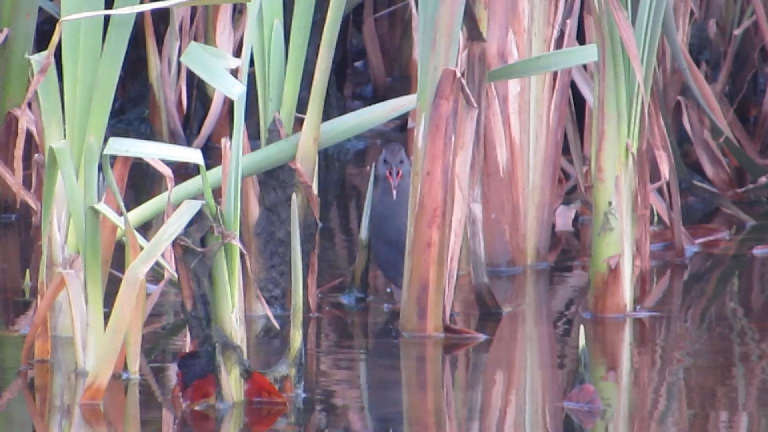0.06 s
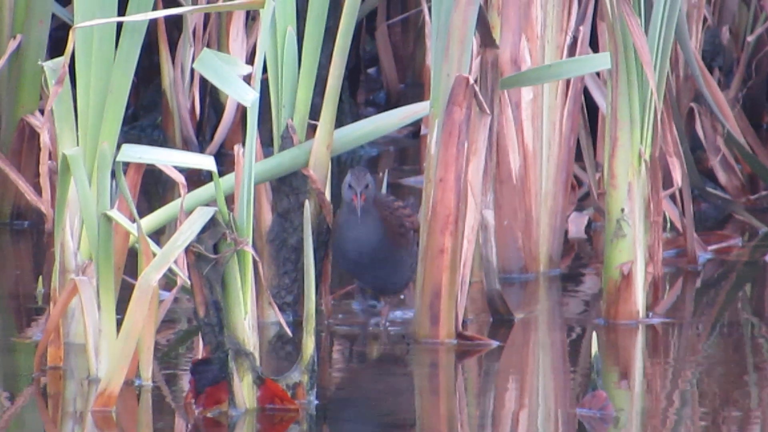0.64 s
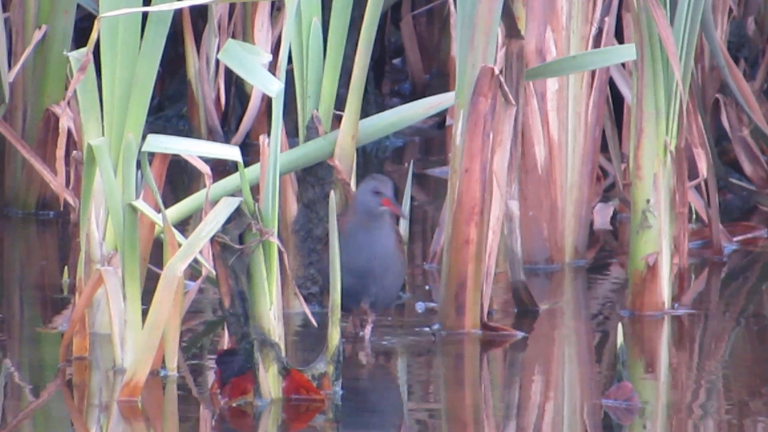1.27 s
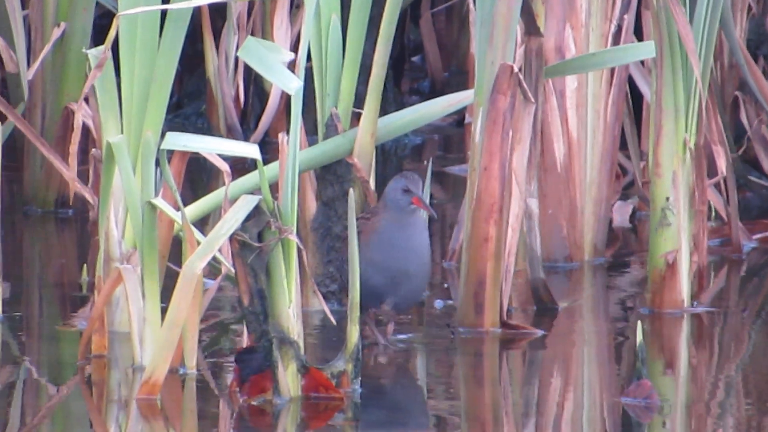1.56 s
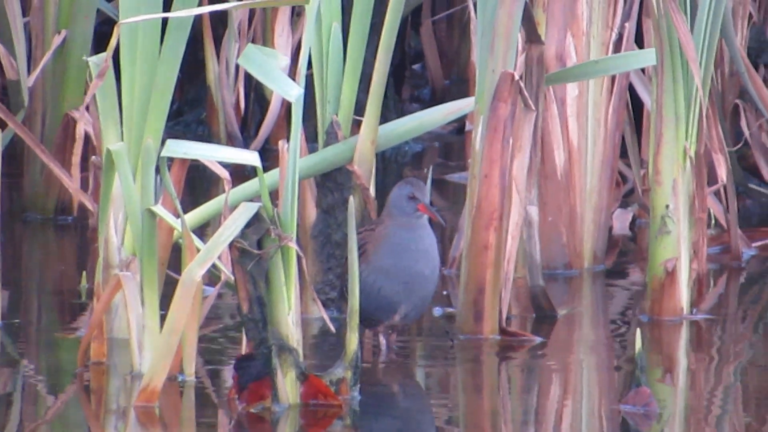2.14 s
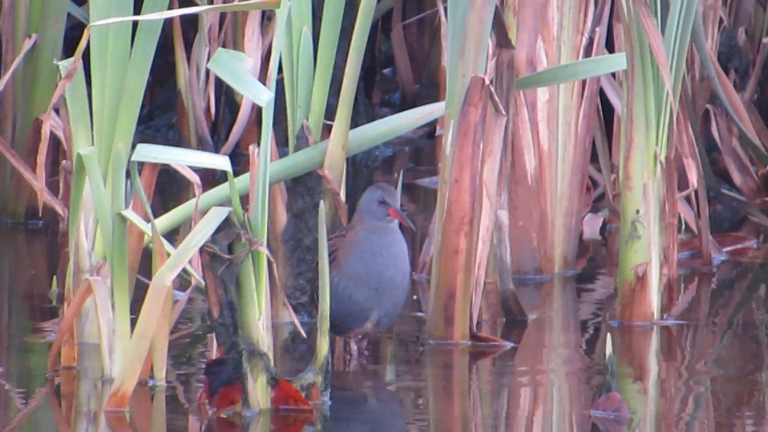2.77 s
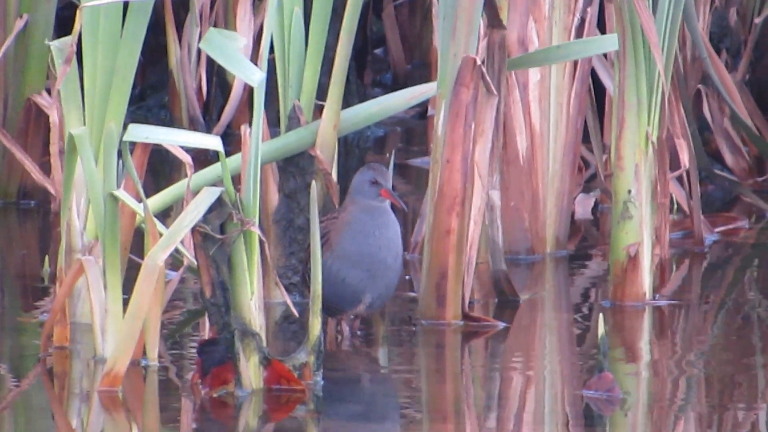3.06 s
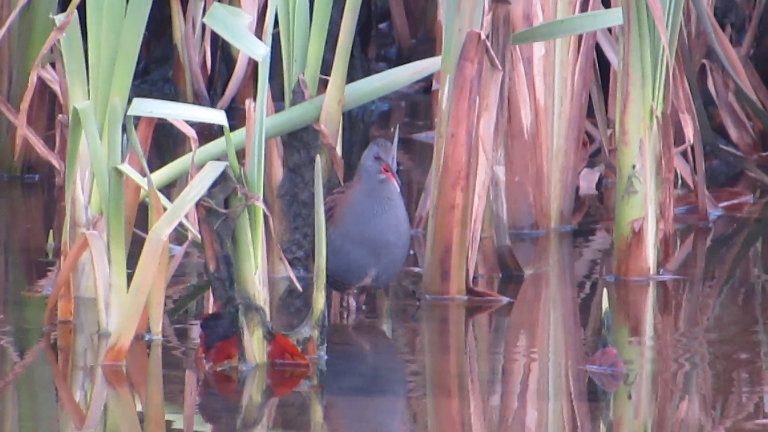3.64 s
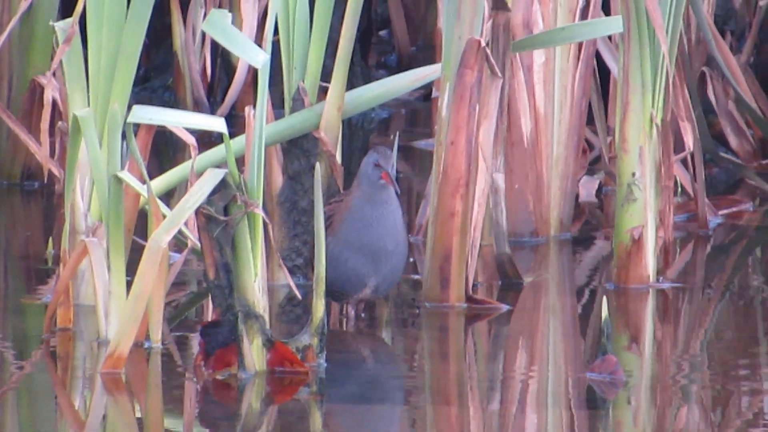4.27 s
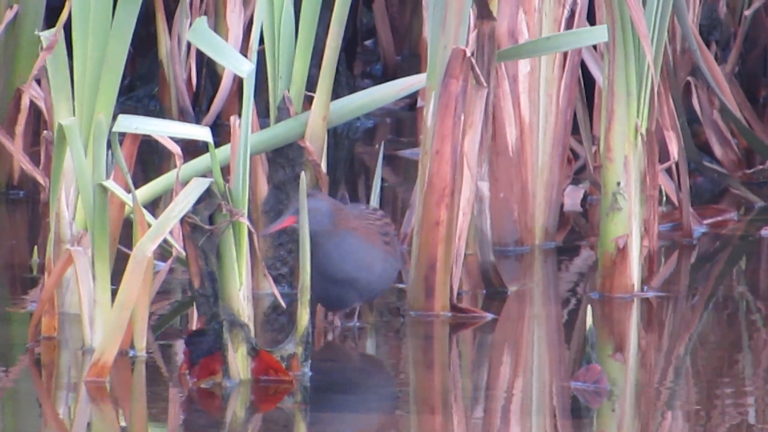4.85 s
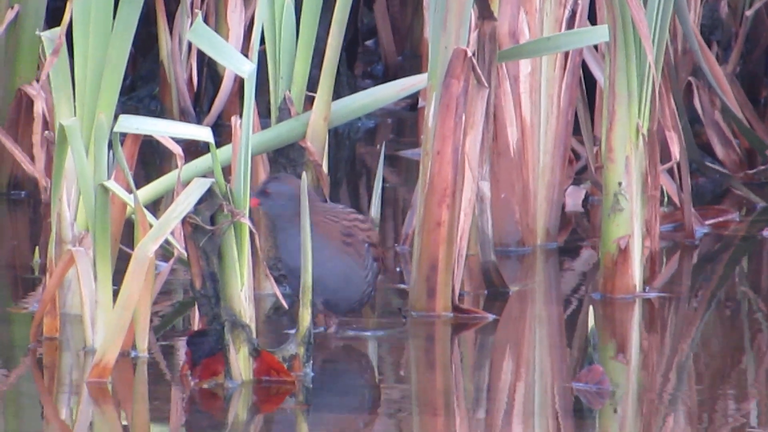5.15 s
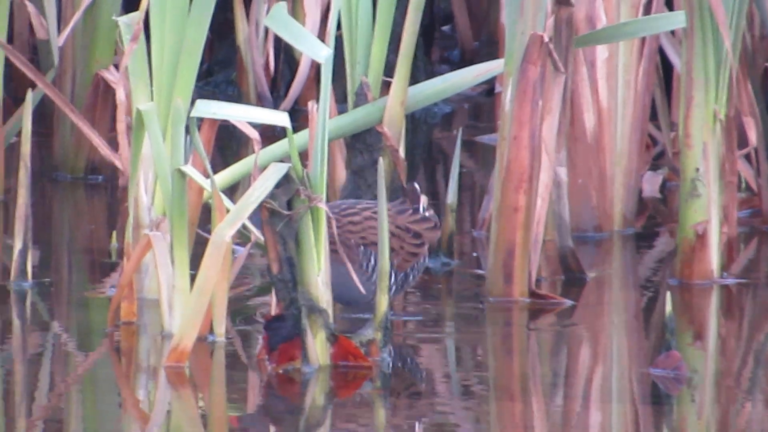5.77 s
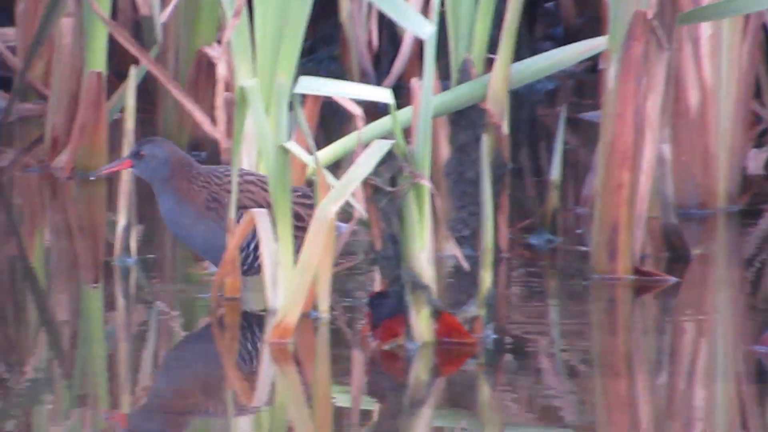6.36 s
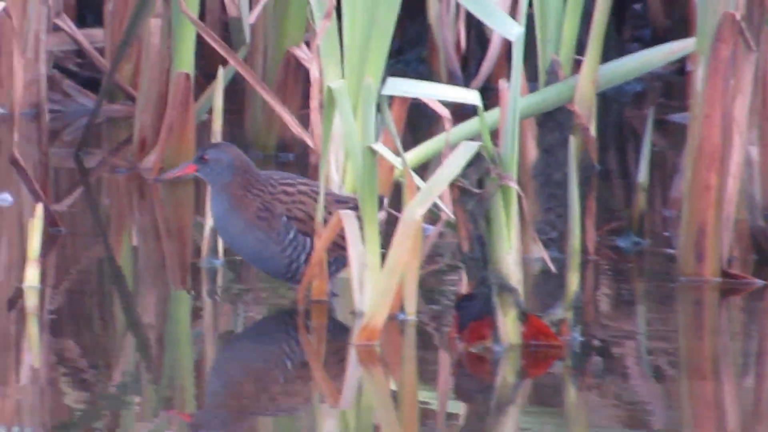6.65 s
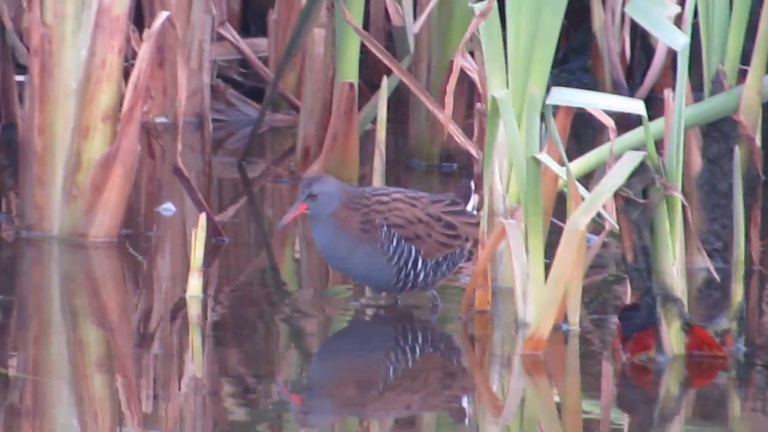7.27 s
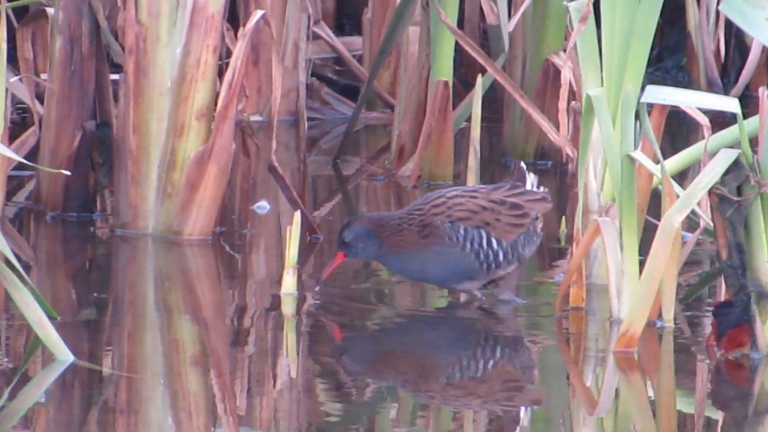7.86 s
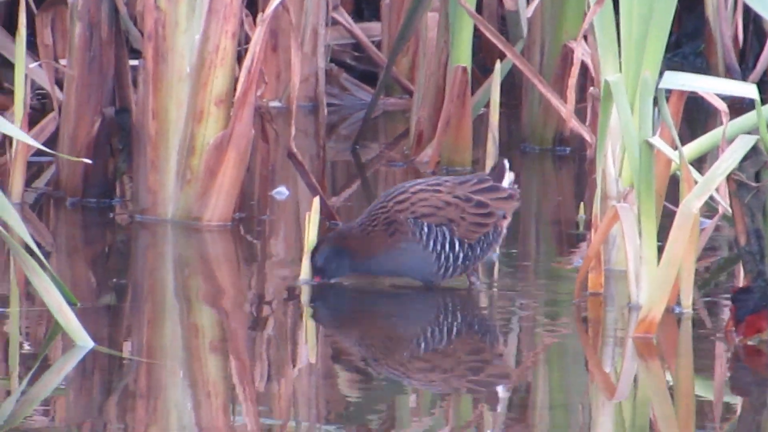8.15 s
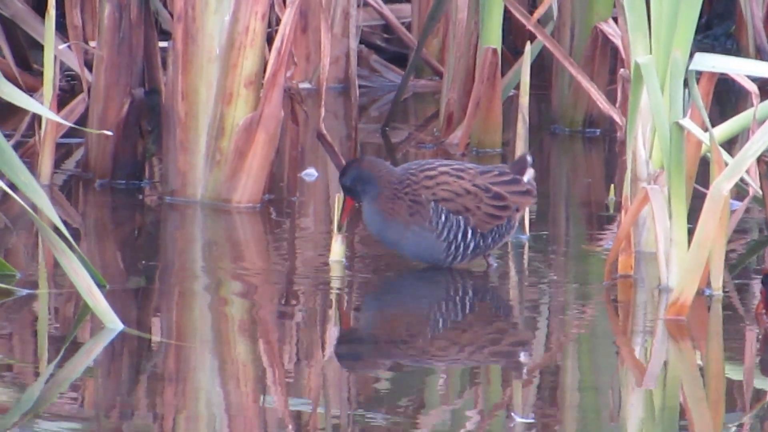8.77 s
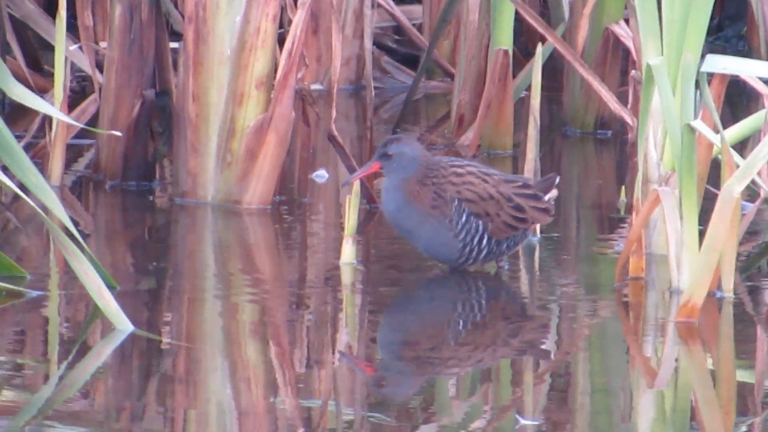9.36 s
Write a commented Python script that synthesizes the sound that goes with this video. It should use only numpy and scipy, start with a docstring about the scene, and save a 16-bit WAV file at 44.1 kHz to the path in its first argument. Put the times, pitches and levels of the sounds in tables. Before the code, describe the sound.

Wind buffets the microphone in uneven thumps over a marsh bird's brief rasping squeals and faint distant chirps.

```python
"""A shallow pool among reeds. A water rail wades and squeals four times: rasp, rising whistle, falling
screech. Other birds call faintly far off, over a soft outdoor murmur and one rustle of the reeds.
Gusts buffet the microphone ports of a hand-held camera, pushing the two channels in opposite directions;
the hardest buffets make its limiter duck the whole scene, which then creeps back.
The camera clicks under the fingers, and its electronics whine thinly."""
import sys
import numpy as np
from scipy import signal
from scipy.io import wavfile
from scipy.ndimage import uniform_filter1d

SR = 44100
rng = np.random.default_rng(int(sys.argv[2]) if len(sys.argv) > 2 else 0)


def waveform_to_disk(signal):
    """Save audio, clipped to [-1, 1], as 16-bit WAV at the path in sys.argv[1]."""
    frames = np.transpose(np.atleast_2d(signal))
    scaled = np.clip(frames, -1, 1) * 32767
    samples = np.round(scaled).astype(np.int16)
    wavfile.write(sys.argv[1], SR, samples)


N = 419391
TIME = np.arange(N) / SR
CUTOFF_HZ = 15800


# throat and bill response: f/Hz, gain/dB
THROAT = [(1100, 0), (1600, -2), (2300, 8.5), (3000, 8), (3700, 7), (4600, -3.5), (5700, -9), (7000, -19),
          (8300, -28), (11000, -27.5), (14000, -48)]
# t/s (start, whistle, break, end), f/Hz (opening, whistle start, whistle end, break, end),
# rise bend (<1 early, >1 late), level/dB (opening, whistle, fall), rasp/0-1 (opening, whistle),
# treble tilt/dB per harmonic
SQUEALS = [(-0.01, 0.123, 0.27, 0.34, 2963, 2450, 2844, 3330, 2050, 1.16, -43.5, -39, -41.5, .82, 0.18, 7),
           (0.901, 1.047, 1.234, 1.31, 2425, 2287, 2833, 3050, 2465, 1.23, -59, -34, -34.5, .84, 0.06, 5.5),
           (3.292, 3.451, 3.68, 3.787, 2760, 2354, 3140, 3140, 2240, .45, -47.5, -35.5, -35, 0.87, 0.7, -5),
           (6.078, 6.175, 6.269, 6.385, 2920, 2520, 2900, 3310, 2420, 1.1, -44, -33, -35, 0.69, 0.08, 1)]


def squeal(row, subharmonic_db=-3, jitter=0.0704, waver=0.0041, flutter_db=2, creak_hz=480):
    """The rail's syrinx whistles, doubles its period as rasp grows, then breaks into a harsh screech."""
    start, _, _, end, *_, treble_db = row
    span = (TIME >= start) & (TIME <= end)
    t, out = TIME[span], np.zeros(N)
    hz, level_db, rasp = squeal_gesture(t, row)
    doubled, chaos = np.clip(2 * rasp, 0, 1), np.clip(2 * rasp - 1, 0, 1)
    unsteady = 1 + waver * drift(73, len(t)) + jitter * chaos ** 2 * drift(390, len(t))
    phase = 2 * np.pi * np.cumsum(hz * unsteady) / SR
    voice = 0
    for k in range(1, 11):
        multiple = k / 2
        throat_db = at_hz(THROAT, multiple * hz) - at_hz(THROAT, hz)
        # top partials fade when the bill points away or the voice is rough
        tilt_db = max(multiple - 2, 0) * (treble_db - 5 * doubled) - 3 * doubled * (multiple >= 2)
        share = from_db(subharmonic_db) * doubled if k % 2 else 1
        gain = share * from_db(throat_db + tilt_db + flutter_db * drift(57, len(t)))
        voice += gain * np.sin(multiple * phase) * (multiple * hz < CUTOFF_HZ)
    # irregular membrane motion fills the throat resonance with noise, in uneven pulses
    scratch = band_pass(rng.standard_normal(len(t)), hz=(2050, 3700))
    creak = np.cos(2 * np.pi * np.cumsum(creak_hz * (1 + 0.151 * drift(78.4, len(t)))) / SR)
    scratch = rms_one(scratch * from_db(7 * creak))
    voice *= 1 + 0.55 * rasp * creak
    hoarse = 0.75 * rasp ** 2
    out[span] = from_db(level_db) * (np.sqrt(2 * (1 - hoarse)) * voice + hoarse * scratch)
    return out


def squeal_gesture(t, row, attack_s=0.0081, flip_s=0.0031, release_s=0.012, swell_db=6, fade_db=4.5):
    """Pitch, level and rasp (0 pure, 0.5 period doubled, 1 harsh) through opening, whistle and fall."""
    start, clear, split, end, opening_hz, first_hz, last_hz, break_hz, end_hz, bend = row[:10]
    opening_db, whistle_db, fall_db, opening_rasp, whistle_rasp = row[10:15]
    silent_db, break_rasp, end_rasp = -57, 0.41, 0.68
    arch = 1 - 0.14 * (progress(t, start, clear) / 0.62 - 1) ** 2
    opening = opening_hz * (arch + 0.04 * drift(24.7, len(t)))
    rise = np.sin(np.pi / 2 * progress(t, clear, split) ** bend) ** 2
    whistle = first_hz + (last_hz - first_hz) * rise
    fall = break_hz + (end_hz - break_hz) * progress(t, split, end) ** 2.2
    hz = np.select([t < clear, t < split], [opening, whistle], fall)
    level_db, rasp = in_time([
        (start, silent_db, opening_rasp),
        (start + attack_s, opening_db, opening_rasp),
        (clear - flip_s, whistle_db - swell_db, opening_rasp),
        (clear, whistle_db - swell_db, whistle_rasp),
        (clear + 0.73 * (split - clear), whistle_db, whistle_rasp),
        (split, whistle_db, whistle_rasp),
        (split + flip_s, fall_db, break_rasp),
        (end - release_s, fall_db - fade_db, end_rasp),
        (end, silent_db, end_rasp)], t)
    return hz, level_db, rasp


# t/s, length/s, f/Hz (start, middle, end), level/dB, octave overtone/dB
SECOND_VOICE = [(3.53, 0.11, 2500, 2550, 2640, -44.5, -28), (6.035, .03, 2050, 2680, 2250, -47, -20),
                (6.103, 0.0566, 3690, 3660, 3380, -44, -28), (6.272, 0.056, 2790, 2770, 2720, -45, -28)]


def water_rail():
    """Squeals among the reeds; the other side of the syrinx joins in with brief whistles."""
    return reed_echo(sum(squeal(row) for row in SQUEALS) + whistles(SECOND_VOICE), wet_db=-13)


def whistles(rows, waver=0.0058, flutter_db=2.5):
    """Thin bird notes on parabolic pitch curves, each with an octave overtone."""
    out = np.zeros(N)
    for s, length, first_hz, middle_hz, last_hz, level_db, octave_db in rows:
        span = (TIME > s) & (TIME < s + length)
        u = (TIME[span] - s) / length
        hz = np.polyval(np.polyfit([0, 0.5, 1], [first_hz, middle_hz, last_hz], 2), u)
        phase = 2 * np.pi * np.cumsum(hz * (1 + waver * drift(110, len(u)))) / SR
        swell = np.sqrt(2 * np.abs(np.sin(np.pi * u)))
        gain = from_db(level_db + flutter_db * drift(30, len(u)))
        out[span] += swell * gain * (np.sin(phase) + from_db(octave_db) * np.sin(2 * phase))
    return out


def reed_echo(x, wet_db, t60_s=0.2):
    """Stems and water scatter a short diffuse tail, different on each side."""
    t = TIME[:SR // 2]
    tail = rng.standard_normal((2, len(t))) * from_db(-60 * t / t60_s) * (t > 0.003)
    tail /= np.sqrt(np.sum(tail ** 2) / 2)
    return x + from_db(wet_db) * signal.fftconvolve(x[None], tail, axes=1)[:, :N]


# sustained wind on the ports: t/s, length/s, relative level/dB
GUSTS = [(0.0, 0.051, -19), (0.236, 0.24, -30), (1.894, 0.047, -14), (2.675, 0.11, -13.5),
         (2.862, 0.39, -1.5), (3.572, .25, -6.5), (4.144, 0.12, -5.5), (4.212, 0.16, 3.5),
         (4.416, 0.047, -5), (4.808, 0.59, -11.5), (5.361, .15, -2.5), (5.533, 0.095, 1.5),
         (5.658, 0.28, -8), (6.52, 0.28, -14.5), (6.905, 0.43, -13), (7.908, 0.38, -11), (8.124, 0.4, -9)]
# brief wind on the ports: t/s, relative level/dB
PUFFS = [(1.002, -15.5), (1.229, -15), (1.57, -28), (2.4, -18.5), (2.721, -8), (3.41, -17), (3.92, -9.5),
         (4.001, -9), (4.601, -9.5), (5.0, -5), (5.801, -2), (6.05, -14), (6.161, -13), (6.7, -7.5),
         (6.93, -8.5), (7.03, -3), (7.12, -8), (7.21, -8), (7.298, -6), (7.902, -7.5), (8.36, -5),
         (8.86, -17), (8.98, -19.5), (9.08, -22), (9.48, -27.5)]


def wind_strength(rise_s=0.025, fall_s=0.04, puff_s=0.02, breeze_db=-29):
    """Gusts, puffs and a light breeze add in power."""
    power = from_db(breeze_db) ** 2
    for s, length, level_db in GUSTS:
        outside = np.maximum(s - TIME, 0) / rise_s + np.maximum(TIME - s - length, 0) / fall_s
        power += (from_db(level_db) * np.exp(-np.minimum(outside, 20))) ** 2
    for s, level_db in PUFFS:
        power += from_db(level_db) ** 2 * bump(s, puff_s)
    return np.sqrt(power)


def wind(lump_db=4, eddy_hz=186.3, steepness=4.86, bass_hz=78, top_hz=1250, common_db=-14, gain_db=-1.3):
    """Eddies roll over the ports in lumps of rumble; a stronger lump is also brighter."""
    lumps = rms_one(from_db(lump_db * np.clip(drift(40), -2, 2)))
    strength = wind_strength() * from_db(gain_db) * lumps
    corner_hz = eddy_hz * (10 * strength) ** 0.41
    rumble, power = 0, 0
    for hz, pair in noise_bands(16, count=14):
        slope = hz ** -0.43 / (1 + (bass_hz / hz) ** 2) ** 0.37
        gain = slope / np.sqrt(1 + (hz / corner_hz) ** (2 * steepness))
        rumble += gain * pair
        power += gain ** 2 * hz
    common, opposed = low_pass(rms_one(rumble / np.sqrt(power)) * strength, top_hz, order=4)
    return stereo(from_db(common_db) * common, opposed)


# hard hits of wind: t/s, level/dB, swing f/Hz, tick share/0-1
BUFFETS = [(1.951, 0, 164, 0.1), (1.977, 11.5, 170, 0.21), (2.718, 2, 150, .15), (2.85, -1, 525, 0.15),
           (2.856, 8.5, 214, 0.07), (2.89, 2, 143, 0.18), (2.909, 9, 195, 0.13), (2.984, 5, 467, 0),
           (3.081, 11, 407, 0.22), (3.156, 10, 390, 0.02), (3.81, 9, 195, .07), (4.203, 16, 460, 0.1),
           (4.209, 10, 332, 0.26), (4.22, 15, 203, 0.24), (5.009, 6, 158, 0.04), (5.385, 8.5, 215, 0.14),
           (5.517, 13, 242, 0.08), (6.953, 7.5, 174, 0.06), (7.02, 0.5, 327, 0.05), (7.114, 3.5, 150, 0.05),
           (7.255, 10, 530, 0.23), (7.905, 4, 302, 0.02), (8.112, 9, 194, 0.11), (8.227, 1, 483, 0.05)]


def buffets(width_cycles=0.43, common_db=-13, tick_s=0.00048):
    """One big thump of wind each, with a sharp tick standing for the limiter's sudden gain step."""
    out = np.zeros(N)
    for s, level_db, hz, tick_share in BUFFETS:
        near = np.abs(TIME - s) < 0.03
        t = TIME[near] - s
        swing = np.exp(-(t * hz / width_cycles) ** 2) * np.cos(2 * np.pi * hz * t)
        tick = tick_share * (t > 0) * np.exp(-np.abs(t) / tick_s)
        out[near] += from_db(level_db) * (swing - tick)
    return stereo(-from_db(common_db) * out, out)


# fingers on the camera: t/s, relative level/dB
CLICKS = [(3.698, -10), (3.704, -13), (4.066, -9), (4.0733, -23.5), (9.344, -43.5)]
# camera shell resonances: f/Hz, width/Hz, relative level/dB
SHELL_MODES = [(750, 1030, -4.5), (1830, 290, 3.5), (2290, 110, 1), (2910, 280, -4), (4850, 690, -4.5),
               (9560, 270, -8), (11300, 390, -5.5)]


def finger_clicks(rise_s=0.0021, fall_s=0.0031, rattle_db=-28, rattle_s=0.016, gain_db=9):
    """Bursts of tiny slips ring the shell and reach the two ports differently."""
    force = np.zeros(N)
    for s, level_db in CLICKS:
        t = np.abs(TIME - s)
        before = np.exp(-t / rise_s) * (t < 0.003)
        after = np.exp(-t / fall_s) + from_db(rattle_db) * np.exp(-t / rattle_s)
        force += from_db(level_db) * np.where(TIME < s, before, after)
    slips = force * rng.standard_normal((2, N)) + 1e-18
    out = 0
    for k, (hz, width_hz, level_db) in enumerate(SHELL_MODES):
        r = np.exp(-np.pi * width_hz / SR)
        mode = signal.lfilter([1, 0, -1], [1, -2 * r * np.cos(2 * np.pi * hz / SR), r * r], slips)
        out += (-1) ** k * from_db(level_db + gain_db) * (1 - r * r) / 2 * mode
    return out * pan(db=-6.5)


# wading steps: t/s, level/dB
SLOSHES = [(0.45, -40.5), (0.73, -41.5)]


def sloshes(half_width_s=0.042, band_hz=(520, 1150)):
    """Water pushed aside by the rail's steps: short, dull swells of noise."""
    swell = sum(from_db(level_db) * bump(s, half_width_s) for s, level_db in SLOSHES)
    return swell * rms_one(band_pass(rng.standard_normal((2, N)), band_hz))


# t/s, length/s, f/Hz (start, middle, end), level/dB, octave overtone/dB
FAR_CALLS = [(0.768, 0.097, 2880, 2720, 2650, -55, -30), (1.717, 0.065, 2550, 2610, 2380, -54.5, -30),
             (4.649, 0.1, 2850, 2830, 2740, -56, -30), (5.435, .08, 7600, 7150, 6700, -56, -51),
             (7.569, 0.025, 1170, 1176, 1150, -43.5, -13), (7.595, 0.175, 1448, 1413, 1190, -49.5, -11.5),
             (9.19, 0.03, 2130, 2050, 2150, -57, -23), (9.44, 0.058, 1064, 1132, 1240, -52.5, -5)]


def far_birds():
    """Faint whistles, scattered by the reeds."""
    return reed_echo(whistles(FAR_CALLS), wet_db=-10.5)


# rustle envelope: t/s, level/dB
REED_LEVEL = [(2.3, -69), (2.48, -42), (2.55, -35), (2.72, -41.5), (3.1, -69)]
# rustle spectrum: f/Hz, relative density/dB
REED_SPECTRUM = [(400, -3), (900, 11), (3000, -9), (5000, -31), (12000, -33)]


def reeds():
    """One breath of wind rustles the reeds."""
    level_db, = in_time(REED_LEVEL, TIME)
    return from_db(level_db) * diffuse_noise(REED_SPECTRUM)


# whine pitch: t/s, f/Hz
WHINE_PITCH = [(0, 8980), (1.85, 9090), (4.1, 9200), (9.5, 9580)]


def whine(lower_db=-28, upper_hz=13287, upper_db=-37, wander_hz=8):
    """Camera electronics: a slowly rising tone and a fainter steady one above it."""
    hz, = in_time(WHINE_PITCH, TIME)
    phase = 2 * np.pi * np.cumsum(hz + wander_hz * drift(20)) / SR
    upper = from_db(upper_db) * np.sin(2 * np.pi * upper_hz * TIME)
    return np.sqrt(2) * stereo(from_db(lower_db) * np.sin(phase), upper)


# envelope of air and whine: t/s, relative level/dB
BACKGROUND_LEVEL = [(0.0, -48), (0.5, -45.5), (1.4, -41), (2.0, -39.5), (2.65, -38.5), (3.3, -42),
                    (5.0, -41), (6.0, -41), (9.5, -46)]
# outdoor air spectrum: f/Hz, relative density/dB
AIR_SPECTRUM = [(150, -1), (300, 0.5), (550, -3.5), (830, -1), (1230, -7.5), (1600, -13), (2400, -18),
                (3400, -20.5), (5500, -24), (8500, -26), (13000, -39)]


def background():
    """Distant murmur and hiss, swelling and fading together with the whine."""
    level_db, = in_time(BACKGROUND_LEVEL, TIME)
    air = from_db(1.5) * diffuse_noise(AIR_SPECTRUM) * pan(db=-0.5)
    return from_db(level_db) * (air + whine())


# diffuse field: f/Hz, left-right correlation/0-1
COHERENCE = [(300, 0), (1300, 0.39), (2400, 0), (6000, 0)]


def diffuse_noise(spectrum, top_hz=14200):
    """Noise from all sides, rms 1."""
    out = 0
    for hz, (mid, side) in noise_bands(125, count=14):
        alike = at_hz(COHERENCE, hz)
        out += from_db(at_hz(spectrum, hz)) * stereo(np.sqrt(1 + alike) * mid, np.sqrt(1 - alike) * side)
    return rms_one(low_pass(out, top_hz, order=10))


def noise_bands(lowest_hz, count):
    """Half-octave bands of two unrelated noises: (centre Hz, pair)."""
    white = rng.standard_normal((2, 2, N))
    for k in range(count):
        low_hz = lowest_hz * 2 ** (k / 2)
        yield low_hz * 2 ** 0.25, band_pass(white[k % 2], (low_hz, low_hz * np.sqrt(2)))


def drift(rate_hz, size=N):
    """Smooth random wander, rms 1."""
    r = np.exp(-16 * np.pi * rate_hz / SR)
    slow = signal.lfilter([1], [1, -2 * r, r * r], rng.standard_normal(size // 8 + 4002))[4000:]
    return np.interp(np.arange(size) / 8, np.arange(len(slow)), rms_one(slow))


def in_time(rows, t):
    """Each column of a curve at times t."""
    s, *columns = np.transpose(rows)
    return [np.interp(t, s, c) for c in columns]


def at_hz(points, hz):
    """A spectrum read on a log-frequency axis."""
    freqs, values = np.transpose(points)
    return np.interp(np.log(hz), np.log(freqs), values)


def progress(t, first_s, last_s):
    return np.clip((t - first_s) / (last_s - first_s), 0, 1)


def bump(centre_s, half_width_s):
    return np.exp(-np.minimum(((TIME - centre_s) / half_width_s) ** 2, 20))


def from_db(db):
    return 10 ** (np.asarray(db) / 20)


def rms_one(x):
    return x / np.sqrt(np.mean(x ** 2) + 1e-20)


def low_pass(x, hz, order):
    return signal.sosfilt(signal.butter(order, hz, fs=SR, output="sos"), x)


def band_pass(x, hz):
    return signal.sosfilt(signal.butter(2, hz, "band", fs=SR, output="sos"), x)


def stereo(mid, side):
    return np.array([mid + side, mid - side])


def pan(db):
    """Channel gains for a left-minus-right level difference."""
    return from_db([[db / 2], [-db / 2]])


def scene():
    """Pool, birds, wind and fingers at the microphone."""
    pool = background() + reeds() + water_rail() + far_birds() + sloshes()
    return pool + (wind() + buffets()) * pan(db=-0.85) + finger_clicks()


def limiter(x, ceiling_db=0.56, quick_db=4.5, quick_db_per_s=13.5, slow_db_per_s=3.5, attack_s=0.0013):
    """Peaks over the ceiling duck both channels; the first quick_db return fast, the rest slowly."""
    over_db = np.maximum(20 * np.log10(np.abs(x).max(axis=0) + 1e-9) - ceiling_db, 0)
    quick = np.maximum.accumulate(over_db + quick_db_per_s * TIME) - quick_db_per_s * TIME
    slow = np.maximum.accumulate(over_db - quick_db + slow_db_per_s * TIME) - slow_db_per_s * TIME
    duck_db = uniform_filter1d(np.maximum(quick, slow), int(attack_s * SR) + 1)
    return x * from_db(-duck_db)


def record(dry):
    """Camera chain: two narrow microphone notches, limiter, soft overload, steep top cut."""
    for hz, width_hz in [(3950, 370), (7900, 240)]:
        dry = signal.lfilter(*signal.iirnotch(hz, hz / width_hz, fs=SR), dry)
    held = limiter(dry)
    rounded = held / (1 + held ** 8) ** (1 / 8)
    return signal.sosfilt(signal.ellip(10, 0.1, 80, CUTOFF_HZ, fs=SR, output="sos"), rounded)


dry = scene()
out = record(dry)
waveform_to_disk(out)
```